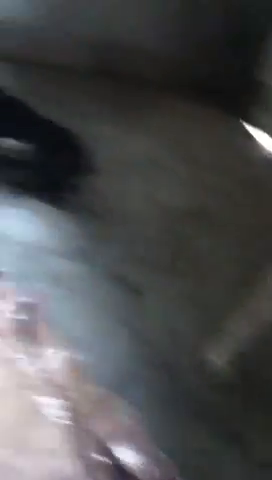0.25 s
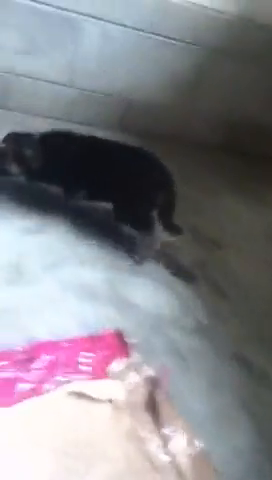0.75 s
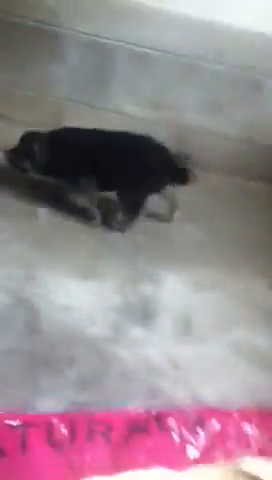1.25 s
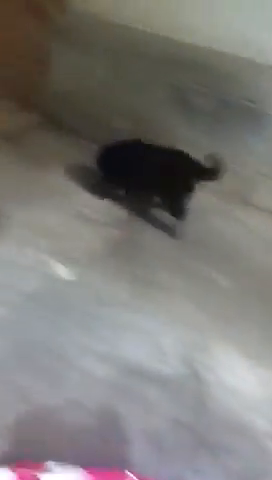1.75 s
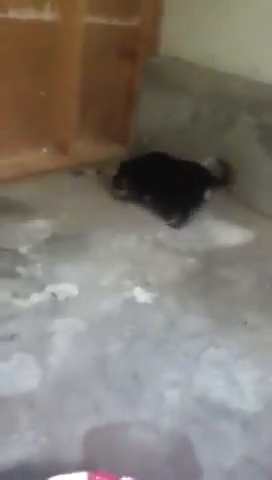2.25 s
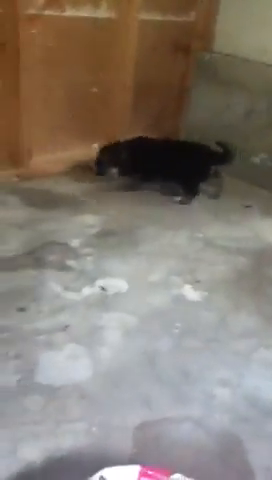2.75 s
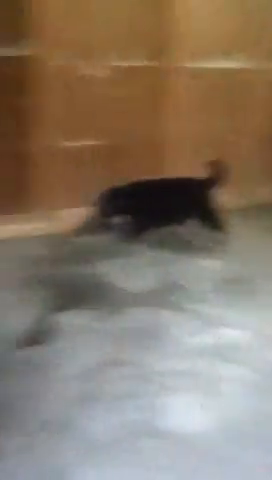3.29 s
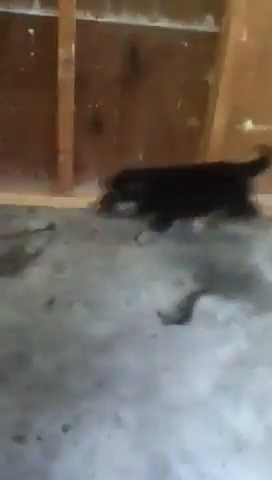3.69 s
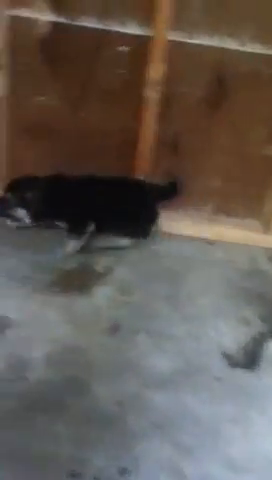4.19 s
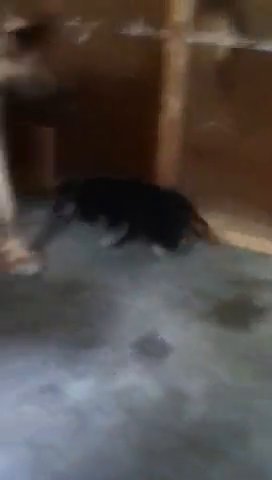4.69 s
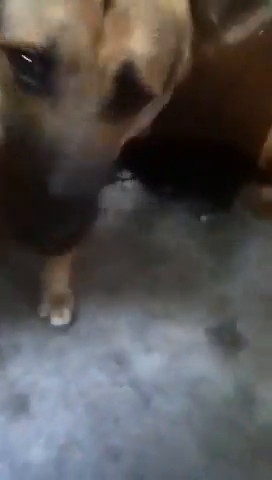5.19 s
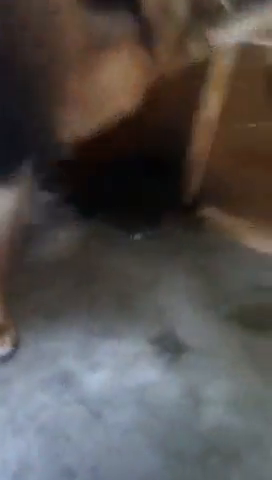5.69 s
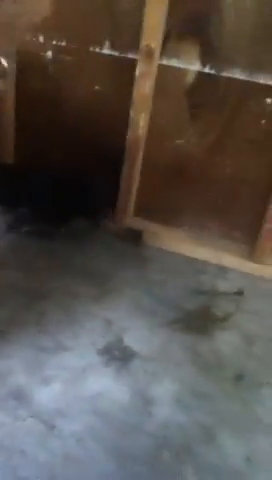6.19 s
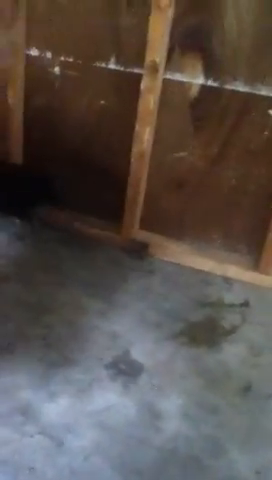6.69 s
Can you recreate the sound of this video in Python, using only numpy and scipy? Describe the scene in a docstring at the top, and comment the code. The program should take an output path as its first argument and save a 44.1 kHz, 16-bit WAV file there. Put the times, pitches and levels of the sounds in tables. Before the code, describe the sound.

Piercing puppy cries ring off hard walls, thinning to faint whimpers, with a quiet low dog growl, soft footfalls and late dry taps.

```python
"""A puppy's yelp, already under way, opens the scene; more yelps and two wails follow,
with soft whimpers between them and at the end. Throat and mouth shape each cry's stack of harmonics.
A big dog grumbles low about five seconds in, as slow pulses ringing in a large chest; both dogs echo
in a bare, hard-walled room. Noise swells make scuffs, rustles and soft footfalls, dry taps ring the case
around the microphone, and behind it all lies a rush of air whose level dips and recovers."""
import sys
import numpy as np
from scipy import signal
from scipy.fft import rfft, irfft, next_fast_len
from scipy.io import wavfile
from scipy.ndimage import uniform_filter1d, minimum_filter1d, map_coordinates

SR = 44100
rng = np.random.default_rng(int(sys.argv[2]) if len(sys.argv) > 2 else 0)


def transcribe(u):
    """Save the signal u as a 16-bit wav file named by the first command-line argument.

    u: samples, shape (n,) or (channels, n), limited to [-1, 1]; the rate is SR.
    q: integer samples, one column per channel.
    """
    v = np.clip(np.atleast_2d(u).T, -1, 1)
    q = np.round(v * 32767).astype(np.int16)
    wavfile.write(sys.argv[1], SR, q)


N = 306054
TIME = np.arange(-SR // 4, N) / SR  # seconds; starts early because the first cry is under way at 0
SIZE = len(TIME)

# All levels in dB are relative: later stages of the sound raise or lower them together.
# Yelps; the one near 1.3 s cracks and jumps upward over three rows:
# start_s, length_s, first_pitch_hz, top_pitch_hz, catch_s, scoop_s, swell_s, level_db,
# fade_db (negative keeps growing), mouth_ring_db, shrillness_db, sheen_db (at 6 kHz),
# added roughness of the catch (0-1), last_muzzle_hz
YELPS = [ (-.1, 0.13, 1119, 1049, .06, 0.18, 0.014, -16, 6.5, 19, 7, -2.5, 0.22, 4500),
         (.201, .153, 763, 981, 0.013, 0.017, 0.011, -9.5, 13.5, 19.5, 13, 5.5, 0.13, 4080),
         (1.257, 0.067, 642.4, 722, 0.0021, .3, 0.012, -8.5, 0, 20, 19, 5, 0.18, 2750),
         (1.325, .025, 923.5, 959, 0.0071, .05, 0.0019, -15.5, 7, 15.5, 6, -0.5, 0.36, 3690),
         (1.357, 0.054, 943, 999.7, 0.0032, 0.09, 0.02, -14, 7, 20, 8.5, 3, 0.067, 3900),
         (1.983, 0.17, 789, 1068, 0.0034, .058, 0.013, -13, 10.5, 15, 7.5, 2.5, 0.37, 2840),
         (2.592, 0.2, 751.5, 1022, .013, 0.047, 0.0066, -12.5, 13, 17, 7.5, 4, 0.18, 5000),
         (3.515, 0.13, 764.4, 944.3, 0.019, 0.081, 0.023, -27.5, 11, -5, -21, 14, 0.7, 4600),
         (4.168, .097, 874.7, 1166, 0.0097, 0.335, 0.014, -15.5, 1, 18, 13.5, -6, 0.65, 4330),
         (4.789, .14, 767, 1034, .016, 0.081, 0.043, -16, 9.5, 11.5, 5, -5.5, 0.8, 2690),
         (5.094, 0.079, 800, 925, 0.0213, 0.049, 0.022, -18, 14.5, 9.5, -19, 0, 0.425, 3500),
         (5.338, 0.048, 713, 826, 0.013, 0.028, 0.0074, -27, 5, -6, -23, -9, 0.91, 3500)]
# The two drawn-out wails, as points along each: time_s, pitch_hz, level_db, mouth_ring_db, shrillness_db
HOWL = [(.35, 1004, -22, 32, 12), (.44, 979.6, -21, 11.5, 12), (.51, 998.7, -22, 12, 7),
        (.6, 980.2, -16.5, 15.5, -2), (.69, 973, -16, 18.5, 1.5), (.75, 978, -8, 22.5, -0.5),
        (.81, 995.3, -11, 19.5, 1), (.87, 971.3, -16.5, 11, -2.5), (.955, 957.8, -16.5, 12, 0),
        (1.0, 968, -26, 3.5, -2)]
WAIL = [(2.96, 951.3, -33.5, 9, -15), (3.04, 961, -24.5, 14, -6.5), (3.075, 983, -18, 7.1, 13),
        (3.15, 1012, -12, 24.8, 10.5), (3.205, 1057, -17.5, 12.4, 2), (3.3, 1038, -29, 57, -14.5)]
# Both wails: course (a table above), sheen_db (at 6 kHz), muzzle_hz
WAILS = [(HOWL, 1.9, 3850), (WAIL, 0.98, 4400)]
# Soft whimpers, some trailing a yelp, some in quick pairs:
# start_s, length_s, pitch_hz (mid-way), glide_hz, peak_db, mouth_ring_db, shrillness_db,
# sheen_db (at 6 kHz), roughness (0-1), muzzle_hz
WHIMPERS = [ (2.134, .18, 1033, -24, -31, -2.5, -13.5, 10.5, .06, 4200),
            (2.749, 0.24, 973.7, -30, -38, 1, -4.5, -9, 0.12, 4050),
            (4.277, 0.16, 1092, -79, -33.5, 6, -17, -10, 0, 4330),
            (4.422, 0.12, 1031, -20, -29, -0.5, -11.5, 1, 0.13, 4200),
            (5.783, 0.052, 492.6, -28, -38.5, -18.5, -22, -2, 0.33, 1940),
            (5.845, 0.029, 483.6, -6.5, -30, -22.5, -25, -1, 0.29, 1900),
            (6.115, 0.062, 449.5, -21.5, -34, -19.5, -23, 5, 0.21, 4560),
            (6.157, 0.054, 455.3, -20, -32, -25, -33, 7, 0.26, 4600),
            (6.4, 0.088, 670.5, -39.5, -36.5, -21, -31.5, 4.5, 0.72, 4100),
            (6.917, .08, 972, 0, -31, 0, -26, 0, .03, 3950)]
# How throat and muzzle colour a cry: frequency_hz, level_db
THROAT = [(300, -28), (460, -24), (650, 7), (1100, 3), (1400, 14), (1650, -3.5), (2000, -4.5),
          (2350, -11.5), (2680, -1.5), (3000, -1.5), (3500, -6), (4000, -3.5), (5000, -8.5), (5900, -15),
          (6500, -32), (7050, -34.5), (7600, -42), (8500, -64.5), (15000, -75)]
# The big dog's grumble over time: time_s, level_db
GROWL_LEVEL = [(5.02, -55), (5.1, -43.5), (5.15, -52), (5.25, -42.5), (5.38, -40), (5.48, -46)]
# The big dog's chest resonances: frequency_hz, width_hz, level_db
CHEST = [(242, 26, -4), (332, 100, -0.5), (462, 140, -8.5)]
# How long the room rings: frequency_hz, time to fall 60 dB (s)
ROOM_RING = [(200, 0.057), (1000, 0.56), (2000, 0.51), (4000, 0.48), (7000, .42), (14000, .25)]
# Scuffs and rustles: middle_s, spread_s, level_db
SCUFFS = [(1.52, 0.069, -50), (3.37, 0.077, -51), (3.689, 0.076, -54), (4.11, .018, -56.5),
          (5.242, 0.0081, -50.5), (6.429, 0.011, -77), (6.716, 0.01, -48.5), (6.772, 0.0038, -46),
          (6.918, 0.024, -41.5)]
# Colour of the rubbing noise: frequency_hz, level_db (per Hz)
RUSTLE = [(120, -33.5), (200, -13.5), (370, -14.5), (2170, -7.5), (3120, -16.5), (3870, -11), (5070, -23.5),
          (7830, -25.5), (15000, -44)]
# Soft footfalls, each loudest 0.01 s after its time: time_s, level_db
PADS = [(2.83, -56), (3.58, -56), (4.039, -47.5), (4.393, -55), (4.73, -53), (4.94, -66), (6.52, -55),
        (6.86, -50.5)]
# Colour of a footfall: frequency_hz, level_db (per Hz)
THUD = [(40, -40), (110, 8.5), (180, 5.0), (500, -6.5), (2000, -35), (8000, -80.0)]
# Taps: time_s, strength_db
TAPS = [(6.76, -20.5), (6.838, -23.5), (6.852, -35.5), (6.862, -10.5)]
# Resonances of the case that the taps ring: frequency_hz, width_hz, level_db
CASE = [(920, 180, -3), (1390, 460, 2.5), (1980, 230, -6), (3660, 210, -11)]
# Colour of the background rush: frequency_hz, level_db (per Hz)
AIR_COLOUR = [(15, -39), (28, -23.5), (60, -8.5), (140, -2), (260, -6), (500, -12), (900, -8),
              (1500, -12.5), (2500, -20), (4000, -19.5), (8000, -23.5), (15600, -29)]
# Background rush over time, pulled down by the recorder's gain control around loud cries
# and then recovering: time_s, level_db
AIR_LEVEL = [(0.0, -60.5), (0.31, -69.5), (1.2, -64.5), (1.27, -70), (5.01, -61.5), (6.42, -64.5),
             (6.94, -61)]

ONSET_DB, RELEASE_S = 16, 0.0048  # a yelp starts this far under its level; every cry closes in this time
RING_PER_DB, SHRILL_PER_DB = 0.09, 0.58  # dB of extra brightness for each dB of push
SETTLE_S, LEAST_ROUGH = 0.02, 0.054  # the vocal folds catch roughly, then settle
MUZZLE_START_HZ = 2680  # a yelp's muzzle resonance moves from here as the lips draw back
DROOP, DROOP_S = .025, .014  # a yelp's pitch sags by this share over its last moments
QUAVER, QUAVER_PER_S = .008, 109.3  # typical share of pitch shaken by strain; random points a second
WAIL_ROUGH = 0.036  # held notes are almost pure
ARCH_DB = 5  # a whimper's ends lie this far under its middle
TOP_HZ = 15780  # nothing passes above this


def puppy():
    """Yelps, wails and whimpers, all from one throat."""
    yelps = sum(yelp(*row) for row in YELPS)
    wails = sum(wail(*row) for row in WAILS)
    whimpers = sum(whimper(*row) for row in WHIMPERS)
    return yelps + wails + whimpers


def yelp(start, length, first_hz, top_hz, catch, scoop, swell, level_db, fade_db,
         ring_db, shrill_db, sheen_db, rough, muzzle_hz):
    """A rough catch, then the pitch slides and levels off; brightness follows the push of breath."""
    t = moments(start, length)
    age = t - start
    progress = np.clip(age / length, 0, 1)
    freed = np.maximum(age - catch, 0)  # seconds since the catch let go
    scooped = np.expm1(-freed / scoop) / np.expm1((catch - length) / scoop)
    pitch = first_hz + (top_hz - first_hz) * scooped
    droop = DROOP * np.exp(np.minimum(age - length, 0) / DROOP_S)
    pitch = pitch * (1 - droop + QUAVER * wobble(QUAVER_PER_S, len(t)))
    push_db = -ONSET_DB * np.exp(-(age / swell) ** 2) - fade_db * progress ** 2
    muzzle = MUZZLE_START_HZ + (muzzle_hz - MUZZLE_START_HZ) * progress ** 2
    roughness = LEAST_ROUGH + rough * np.exp(-freed / SETTLE_S)
    return cry(t, pitch, level_db + push_db, ring_db + RING_PER_DB * push_db,
               shrill_db + SHRILL_PER_DB * push_db, sheen_db, roughness, muzzle)


def wail(course, sheen_db, muzzle_hz):
    """A long clear note whose pitch wavers and whose level swells along its course."""
    t = moments(course[0][0], course[-1][0] - course[0][0])
    return cry(t, *curves(course, t), sheen_db, WAIL_ROUGH, muzzle_hz, rasp_db=-19.5, muzzle_db=4)


def whimper(start, length, pitch_hz, glide_hz, peak_db, ring_db, shrill_db, sheen_db, rough, muzzle_hz):
    """A soft arch of sound on a gently sliding pitch; the nearly shut mouth rings sharply."""
    t = moments(start, length)
    off_centre = (t - start) / length - .5
    pitch = pitch_hz + glide_hz * off_centre
    level_db = peak_db - ARCH_DB * (2 * off_centre) ** 2
    return cry(t, pitch, level_db, ring_db, shrill_db, sheen_db, rough, muzzle_hz,
               jitter=0.059, shimmer=.24, doubling=0.67, muzzle_db=12, muzzle_width_hz=73)


def cry(t, pitch, level_db, ring_db, shrill_db, sheen_db, rough, muzzle_hz, jitter=0.046, shimmer=0.13,
        doubling=1.0, rasp_db=-18, muzzle_db=6, muzzle_width_hz=330, attack=0.0024):
    """One cry: harmonics of the vocal folds shaped by the throat; strain makes them shake and rasp."""
    rough = np.clip(rough, 0, 1)
    waver = .0018 * wobble(35, len(t))
    pitch = pitch * (1 + jitter * rough * wobble(350, len(t)) + waver)
    phase = 2 * np.pi * np.cumsum(pitch) / SR
    voice, power = 0, 0
    for k in [1.5, 2.5, 3.5, *range(1, 13)]:
        hz = k * pitch
        # an open mouth lifts the middle harmonics, a hard push the top ones
        middle = np.clip((hz - 1150) / 130, 0, 1)
        top = np.clip((hz - 2300) / 200, 0, 1)
        gain = amp(along(THROAT, hz) + (middle - top) * ring_db + top * shrill_db)
        muzzle_peak = 1 / (1 + ((hz - muzzle_hz) / muzzle_width_hz) ** 2)
        gain = gain * amp(muzzle_db * (muzzle_peak - top / 3))
        # the highest harmonics beam where the head points
        gain = gain * amp(sheen_db * np.clip((hz - 4200) / 1800, 0, 1.5))
        if k % 1:  # rough moments alternate strong and weak cycles: extra tones halfway between harmonics
            gain = gain * doubling * rough ** 3 / (k - .5)
        voice = voice + gain * np.sin(k * phase)
        power = power + gain ** 2 / 2
    flutter = 1 + shimmer * rough * wobble(700, len(t))
    flutter = flutter + amp(rasp_db) * np.sqrt(rough) * wobble(1600, len(t))
    gate = np.clip((t - t[0]) / attack, 0, 1) * np.clip((t[-1] - t) / RELEASE_S, 0, 1)
    out = np.zeros(SIZE)
    # dividing by the harmonics' strength keeps their colour from changing the loudness
    out[np.searchsorted(TIME, t)] = amp(level_db) * gate * flutter * voice / np.sqrt(power)
    return out


def moments(start, length):
    """The sample times of one cry, with its release."""
    return TIME[(TIME >= start) & (TIME < start + length + RELEASE_S)]


def big_dog(growl_hz=84, growl_db=-2):
    """A low grumble: slow uneven pulses in a large chest."""
    cycles = np.floor(np.cumsum(growl_hz * (1 + 0.059 * wobble(60))) / SR)
    pulses = np.diff(cycles, prepend=0) * amp(3 * wobble(80))  # one click per cycle, uneven in strength
    opening = np.clip((TIME - GROWL_LEVEL[0][0]) / .05, 0, 1)
    closing = np.clip((GROWL_LEVEL[-1][0] - TIME) / 0.036, 0, 1)
    rumble = unit(resonate(resonate(pulses, CHEST), CHEST))  # twice for steeper resonances
    return opening * closing * amp(curves(GROWL_LEVEL)[0] + growl_db) * rumble


def room(x, direct_db=-3, echo_db=-4, count=22):
    """Hard walls ring on; the echo pattern changes as dogs and microphone move."""
    wet = np.zeros(SIZE)
    for centre in np.linspace(0, SIZE, count):
        # an echo tail is noise that dies away at its own speed at each frequency
        hz, t, z = signal.stft(rng.standard_normal(SR), SR, nperseg=256)
        decay = amp(-60 * t / along(ROOM_RING, hz)[:, None]) * (t > .004)
        tail = signal.istft(z * decay, SR, nperseg=256)[1]
        tail /= np.sqrt(np.mean(np.abs(rfft(tail, SR)[800:4000]) ** 2))  # average gain 1 over 800-4000 Hz
        # each tail fades over into the next
        nearness = 1 - np.abs(np.arange(SIZE) - centre) * (count - 1) / SIZE
        share = np.sqrt(np.clip(nearness, 0, 1))
        wet += signal.oaconvolve(x * share, tail)[:SIZE]
    return amp(direct_db) * x + amp(echo_db) * wet


def scuffs(grain_db=3):
    """Grainy swells of rubbing noise, and the dull low noise of padding feet."""
    swell = sum(amp(db) * np.exp(-.5 * ((TIME - s) / spread) ** 2) for s, spread, db in SCUFFS)
    steps = sum(amp(db) * np.exp(-.5 * ((TIME - s - .01) / 0.012) ** 2) for s, db in PADS)
    rubbing = unit(noise(RUSTLE) * amp(grain_db * wobble(450)))
    return swell * rubbing + steps * noise(THUD)


def taps(tap_db=0, contact=0.0011):
    """Short dry knocks: single clicks, a moment after first contact, ring the microphone's case."""
    blows = np.zeros(SIZE)
    for s, db in TAPS:
        blows[np.searchsorted(TIME, s + contact)] = amp(db)
    # soft contact leaves little above the case's top resonance
    softener = signal.butter(4, 4500, fs=SR, output='sos')
    knocks = signal.sosfilt(softener, resonate(blows, CASE))
    return amp(tap_db) * knocks * blows.max() / np.abs(knocks).max()


def air(air_db=7.0):
    """Background rush: coloured noise whose level follows a table of dips and recoveries, plus a slight drift."""
    level_db = curves(AIR_LEVEL)[0] + air_db + .4 * wobble(3)
    return amp(level_db) * noise(AIR_COLOUR)


def amp(db):
    """Turn decibels into a plain multiplier."""
    return 10 ** (np.asarray(db) / 20)


def unit(x):
    """Scale to an average (rms) strength of 1."""
    return x / np.sqrt(np.mean(x ** 2) + 1e-20)


def along(points, hz):
    """Read a (frequency, value) table at any frequency, on a log axis."""
    f, v = np.transpose(points)
    return np.interp(np.log(hz + 1), np.log(f + 1), v)


def curves(rows, t=TIME):
    """Read each column after the time column at the times t."""
    s, *columns = np.transpose(rows)
    return [np.interp(t, s, column) for column in columns]


def wobble(rate, size=SIZE):
    """A smooth random curve through this many random points a second."""
    points = rng.standard_normal(int(size * rate / SR) + 4)
    return map_coordinates(points, [np.arange(size) * rate / SR])


def filtered(x, response):
    """Multiply each frequency in x by the response there."""
    m = next_fast_len(len(x) + SR // 2)
    return irfft(rfft(x, m) * response(np.fft.rfftfreq(m, 1 / SR)), m)[:len(x)]


def noise(spectrum):
    """Random hiss coloured by a spectrum, at rms 1."""
    return unit(filtered(rng.standard_normal(SIZE), lambda hz: amp(along(spectrum, hz))))


def resonate(x, modes):
    """Ring x through a few damped resonances, side by side."""
    def response(f):
        """Each resonance is loudest at its centre c and dies away faster when its width w is larger."""
        return sum(amp(db) * 1j * f * w / (c * c - f * f + 1j * f * w) for c, w, db in modes)
    return filtered(x, response)


def scene():
    """The dogs in the room, small close noises and the background."""
    dogs = room(puppy() + big_dog())
    return (dogs + scuffs() + taps() + air())[None, -N:]  # drop the time before 0 s


def record(dry, ceiling=.72):
    """A fast limiter holds the loudest peaks, then everything above the top frequency is cut off."""
    sound = dry[0] * np.clip(np.arange(N) / 130, 0, 1)  # a 3 ms fade-in avoids a click at the start
    needed = np.minimum(1, ceiling / (np.abs(sound) + 1e-9))
    gain = uniform_filter1d(minimum_filter1d(needed, size=600), size=400)
    return filtered(sound * gain, lambda hz: hz < TOP_HZ)[None]


dry = scene()
out = record(dry)
transcribe(out)
```